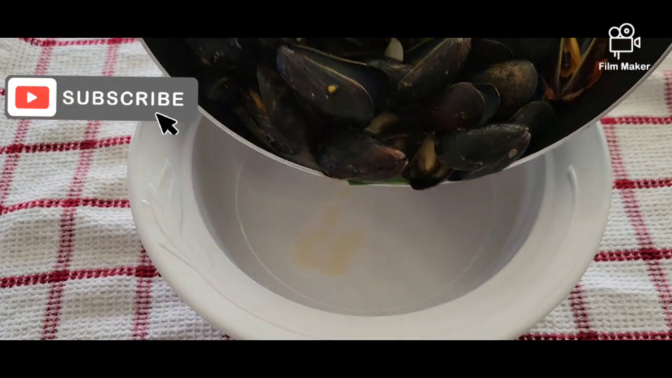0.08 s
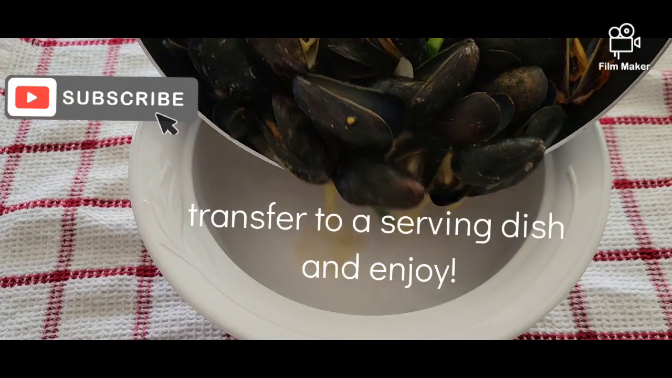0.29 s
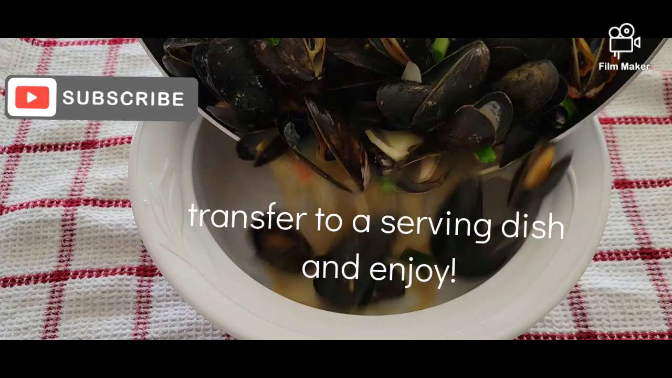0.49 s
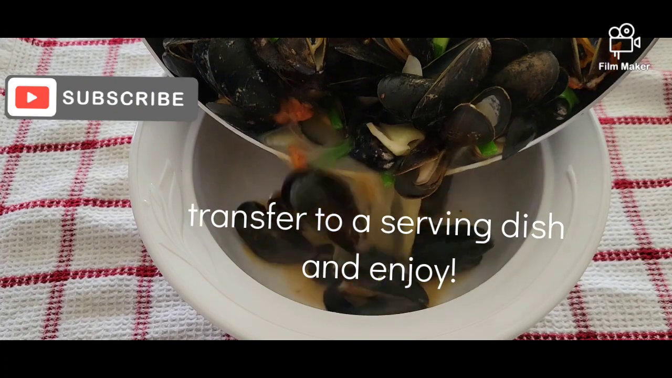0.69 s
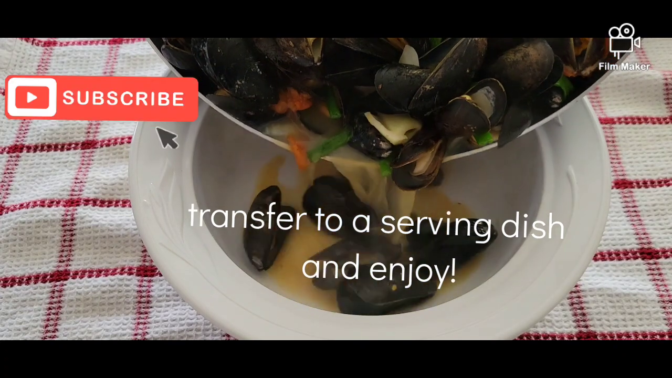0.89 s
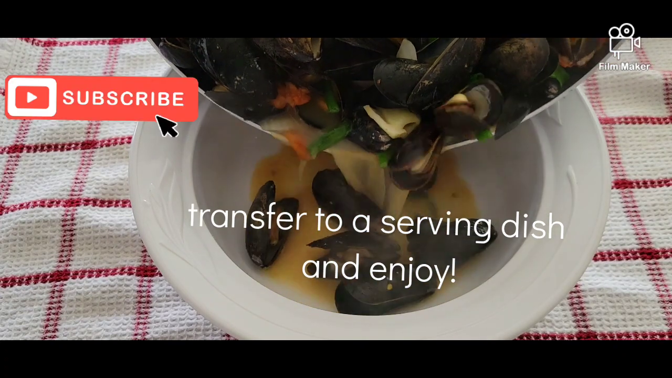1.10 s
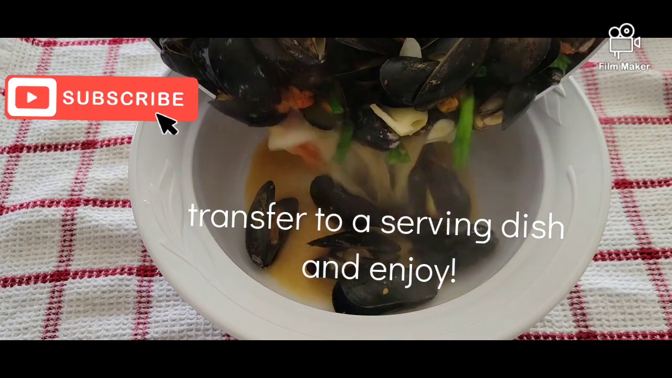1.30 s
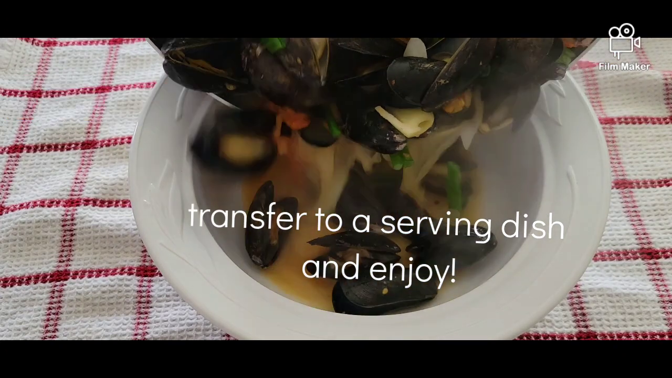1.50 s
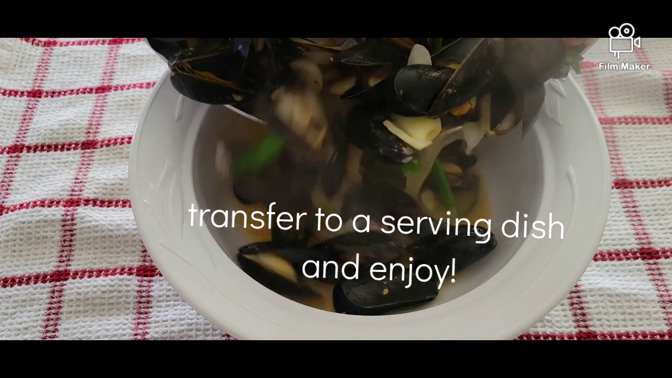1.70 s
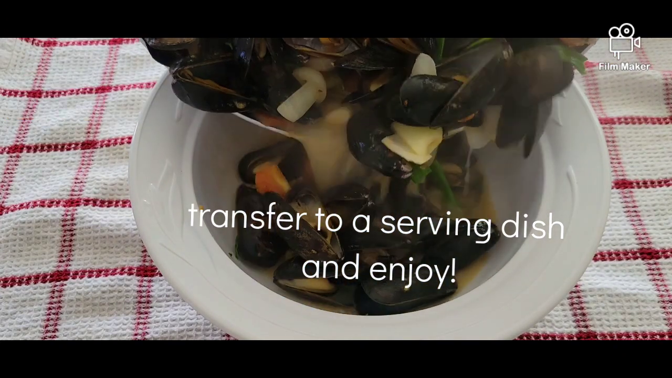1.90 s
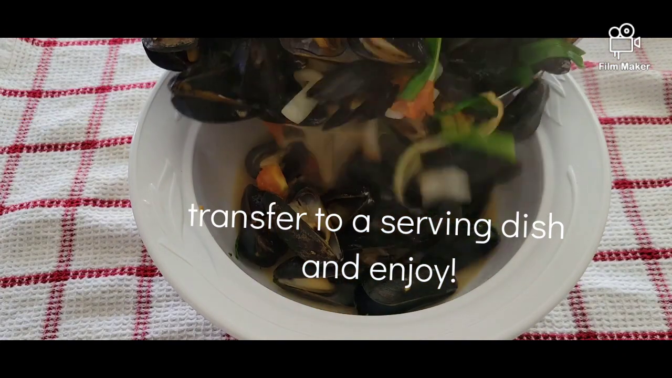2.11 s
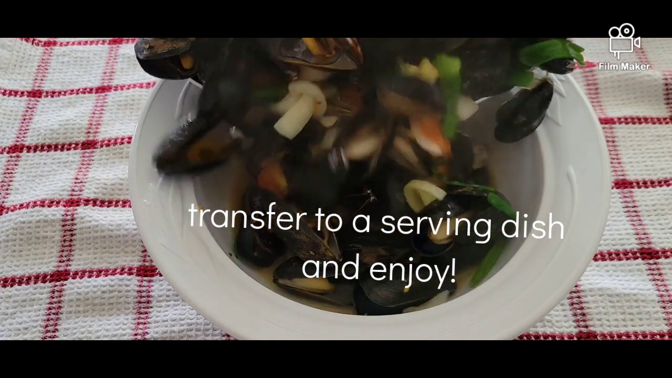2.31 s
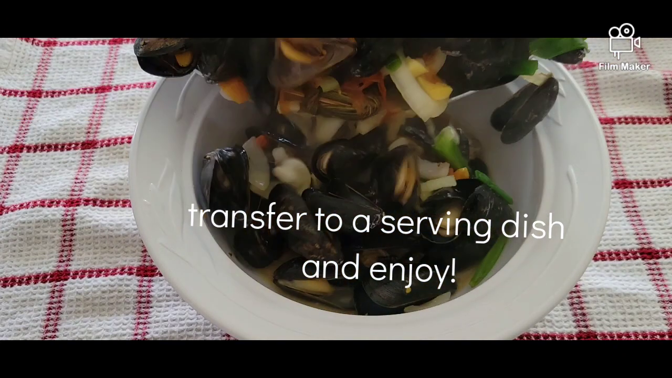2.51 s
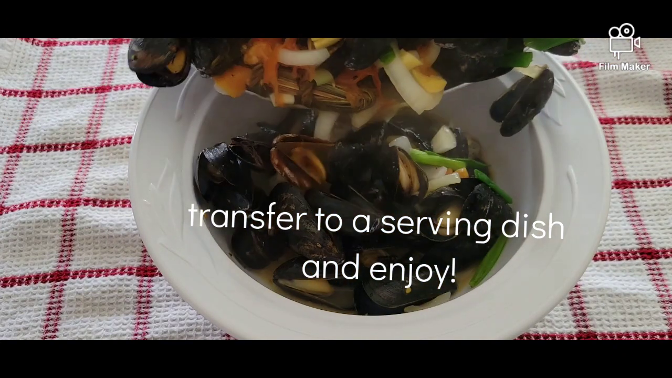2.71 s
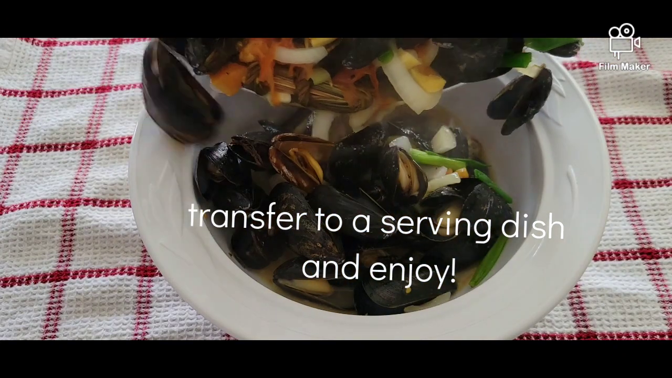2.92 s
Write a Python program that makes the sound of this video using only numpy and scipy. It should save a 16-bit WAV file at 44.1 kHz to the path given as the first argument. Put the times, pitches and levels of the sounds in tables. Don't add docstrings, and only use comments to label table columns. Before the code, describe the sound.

Mussel shells clatter into a ceramic bowl. After faint hum, a hollow knock lands at 0.23 s, then a dense, bright crash with ceramic ringing at 0.45-0.65. Separate clacks follow at 0.7-0.9, lighter rattles around 1.25-1.4, busy clatter at 1.54-1.85 and again 2.0-2.5, thinning to soft knocks and ticks by 2.9. Close, small kitchen, short reverberation, steady low hum.

```python
import sys
import numpy as np
from scipy import signal
from scipy.fft import rfft, irfft
from scipy.io import wavfile
from scipy.ndimage import uniform_filter1d

SR = 44100
rng = np.random.default_rng(int(sys.argv[2]) if len(sys.argv) > 2 else 0)


def dump(signal):
    limited = np.clip(np.atleast_2d(signal).T, -1, 1)
    pcm = np.round(limited * 32767).astype(np.int16)
    wavfile.write(sys.argv[1], SR, pcm)


def level_to_linear(level):
    exponent = np.asarray(level, float) / 20
    return 10 ** exponent


N = 130095

# (time
# [s], peak level # [dB], shell pitch [Hz], treble level [dB])
FURTHER_CLACKS = [(.297, -31, 2150, -29), (0.3855, -30, 1320, -25), (0.4654, -19, 3800, 1.5),
                  (0.723, -21, 3380, -34), (0.741, -24.5, 1980, -25), (0.755, -20, 1780, -27),
                  (0.807, -26, 2850, -25), (1.18, -43, 5430, -12), (1.198, -50, 7160, -5.5),
                  (1.2734, -15.5, 2350, -15.5), (1.3557, -38, 3800, -9), (1.439, -30, 2500, -50),
                  (1.486, -32, 1740, -26), (1.5094, -34, 8700, -7), (2.0125, -25.5, 1840, -24),
                  (2.5754, -29, 4020, -48), (2.765, -34, 1810, -33), (2.8715, -33, 2330, -18)]
CRASH_CLACKS = [
    (0.4499, -10.5, 3750, -5),
    (0.4581, -3.5, 3290, -13.5),
    (0.5025, -7.5, 7530, -6),
    (0.5309, -5, 4990, -10.5),
    (0.5627, -11, 6250, -4.5),
    (0.5905, -8.5, 3330, -19.5),
    (0.6059, -10, 4840, -7),
    (0.6388, -13.5, 12000, -4),
]
POUR_CLACKS = [(0.2344, -7, 2153, -31), (0.4, -17.5, 3180, -29), (0.7046, -10, 2063, -16),
               (0.778, -23, 5070, -19), (0.8123, -16.5, 2826, -21), (0.8556, -21.5, 3260, -21.5),
               (0.8809, -8, 3006, -20), (1.039, -28.5, 1850, -26.5), (1.2568, -27.5, 3780, -15.5),
               (1.268, -19, 1644, -16.5), (1.285, -15, 4500, -20.5), (1.3112, -16.5, 3040, -20),
               (1.3263, -26, 1490, -9.5), (1.3667, -21, 4360, -8), (1.3953, -20.5, 3370, -11.5),
               (1.5398, -7.5, 3950, -16.5), (1.5578, -8.5, 3070, -9), (1.5881, -10, 3180, -36),
                 (1.6229, -8.5, 3190, -17), (1.634, -6.5, 2150, -15.5), (1.731, -6.5, 3030, -28),
                 (1.7516, -9.5, 2105, -5.5), (1.7874, -14, 2060, -9), (1.7994, -18.5, 2130, -7),
                 (1.8236, -9.5, 4090, -6.5), (1.8404, -27, 1970, -15.5), (2.0303, -13, 2090, -20),
                 (2.0619, -16, 2104, -12), (2.0896, -10.5, 2070, -19), (2.1116, -12.5, 3430, -28),
                 (2.1322, -18, 1460, -10.5), (2.1398, -7.5, 3500, -47), (2.1517, -5.5, 2090, -22.5),
               (2.2014, -17.5, 2040, -12), (2.2433, -13.5, 3010, -22.5), (2.2648, -15.5, 2720, -10),
               (2.2737, -12, 3000, -28), (2.3141, -7, 2036, -14), (2.3815, -5.5, 2070, -26),
               (2.4069, -10, 2040, -21), (2.4344, -8.5, 1645, -20), (2.4768, -16, 2034, -31),
               (2.5247, -14, 5130, -19), (2.613, -15.5, 2165, -17.5), (2.630, -19.5, 2160, -18),
               (2.6599, -15, 1730, -24), (2.6774, -24.5, 1820, -17.5), (2.82, -24, 2045, -22.5),
               (2.9205, -25.5, 1640, -45), (2.9444, -30, 1430, -33)]
ALL_CLACKS = FURTHER_CLACKS + CRASH_CLACKS + POUR_CLACKS
# (time [s], lowest mode level [dB], second mode level [dB], upper modes level [dB], ring length factor [1])
BOWL_STRIKES = [(0.232, -60, -15, -43, 0.16), (0.448, -27.5, -21.5, -19.5, 1.46),
                (0.523, -28, -12.5, -16, 2), (0.563, -31.5, -22.5, -30, 1.4),
                (0.581, -31, -29.5, -33.5, 1.2), (0.702, -31, -32, -59, 1.3),
                (0.883, -40.5, -49.5, -36, 0.72), (1.539, -28.5, -17.5, -27, 0.4),
                (1.635, -32.5, -18.5, -22, 0.76), (1.751, -30.5, -19, -17.5, 0.98),
                (1.787, -39, -28.5, -61, 1.55), (2.027, -21, -23, -45, 0.87), (2.263, -34.5, -20, -47, 0.3),
                (2.315, -27, -19.5, -17, 1.1), (2.614, -42.5, -27.5, -32.5, 0.33),
                (2.82, -22.5, -27, -47, 0.33)]
# (frequency [Hz], level [dB], T60 [s])
BOWL_MODES = [(772, -2, 0.6), (2146, 0, 0.33), (3862, 0, 0.25), (5087, 0, 0.12), (5437, -1, 0.25),
              (6115, 2, 0.13), (6647, 0, 0.25), (7815, -8, 0.15), (8030, -8, .15), (8640, -2, 0.2),
              (10860, -9, .2), (5290, -2, .15)]
STRIKE_ARCS = [.6, 0, -.9, 0, 0, .3, -.6, .3, .1, .15, .3, .6, .6, .95, 0, .2]
MODE_ARCS = [0, 0, .6, -1, 0, 1, 0, -1, 1, 0, 0, 1]
# (time [s], note level [dB], pitch [Hz], T60 [s], slap level [dB])
LANDINGS = [(.222, -42, 470, 0.037, -28.5), (.233, -8.5, 528, 0.059, -14), (0.233, -24, 1101, 0.071, -23.5),
            (0.255, -15.5, 513, 0.069, -17), (.29, -28.5, 700, 0.11, -34), (.313, -22, 475, 0.074, -23.5),
            (0.453, -30.5, 484.6, 0.35, -34.5), (.698, -23, 491, 0.053, -22), (.700, -31, 108, 0.029, -18),
            (.703, -21, 1150, 0.035, -15), (.755, -30, 503, 0.046, -26.5), (0.776, -30, 1882, 0.23, -41),
            (.814, -14.5, 1850, 0.018, -46), (.849, -22.5, 1850, 0.027, -38), (.860, -46, 300, .04, -32),
            (.880, 0.5, 1729, 0.021, -18), (0.891, -21, 1803, 0.052, -58), (1.27, -36.5, 530, 0.1, -40),
            (2.061, -22, 915, 0.023, -12.5), (2.191, -24.5, 409, 0.037, -21), (2.194, -20, 828, .04, -17.5),
            (2.198, -33, 253, 0.076, -32), (2.624, -22.5, 1005, 0.028, -26),
            (2.818, -30.5, 144, 0.066, -41), (1.540, -22, 838, .06, -32), (1.752, -24.5, 837, 0.058, -23),
            (1.84, -21.5, 1484, 0.034, -25.5), (2.661, -13.5, 1858, 0.023, -31),
            (.8135, -17, 2890, 0.028, -38), (.856, -16, 3290, 0.021, -36), (1.731, -13, 3096, 0.022, -37),
            (1.587, -19, 3130, 0.039, -37)]
# (frequency [Hz], level [dB], T60 [s])
TABLE_MODES = [(58.6, -26.5, 0.24), (79.7, -33.5, 0.24), (141, -26, 0.12)]
# (frequency [Hz], T60 [s])
ROOM_T60 = [(450, 0.74), (2000, 0.46), (5000, 0.51), (10000, 0.25)]
# (frequency [Hz], level per Hz [dB])
AIR_SPECTRUM = [(24, -48), (40, -20), (140, -3.5), (215, -5.5), (422, -18.5), (4340, -38), (10200, -51),
                (16000, -41)]

PORT_LAG_S = 0.00009
ALIKE_BELOW_HZ = 870
BASS_SIDE_DB = -15
OPPOSITE = np.array([[1], [-1]])


def unit(x):
    return x / np.sqrt(np.mean(x ** 2))


def curve(table, hz):
    table = np.array(table)
    return np.interp(np.log(np.maximum(hz, 1)), np.log(np.maximum(table[:, 0], 1)), table[:, 1])


def band(x, hz, width):
    f = np.arange(x.shape[-1] // 2 + 1) * SR / x.shape[-1]
    return irfft(rfft(x) / (1 + ((f - hz) / width * 2) ** 4), x.shape[-1])


def walk(rate):
    k = int(SR / rate)
    smooth = uniform_filter1d(rng.standard_normal(N), k)
    return unit(uniform_filter1d(smooth, k))


def ring(t, hz, db, t60, rise):
    t = np.maximum(t, 0)[..., None]
    decay = level_to_linear(db - 60 * t / t60)
    onset = 1 - np.exp(-t / rise)
    return (decay * onset * np.sin(2 * np.pi * hz * t)).sum(-1)


def add(out, s, sound):
    i = int(s * SR)
    out[:, i:i + sound.shape[1]] += sound[:, :max(N - i, 0)]


def ports(count, place):
    return np.arange(count) / SR - PORT_LAG_S * (1.06 + place * OPPOSITE)


def clacks():
    lead_s, crack_s, rattle_s = 0.0025, 0.0012, 0.012
    out = np.zeros((2, N))
    f = np.arange(1025) * SR / 2048
    for s, db, hz, treble_db in ALL_CLACKS:
        t = ports(count=2048, place=rng.uniform(-1.58, 1)) - 3 * lead_s
        t60 = 0.019 * (2500 / hz) ** 0.5
        note = ring(t, hz * np.array([1, 1.07]), 1.5 - np.array([0, 5]), t60, rise=0.0019)

        ripple = unit(uniform_filter1d(rng.standard_normal(len(f)), size=24))
        slope = np.clip(np.log(f / 3695 + 1e-9) / 1.14, 0, 1.3)
        low_cut = 1 + (1343 / (f + 1)) ** 3
        colour = level_to_linear(3.5 * ripple + (treble_db - 0.5) * slope) / low_cut
        noise = rng.standard_normal((3, len(t[0])))
        grit = irfft(rfft(noise[:2] + 0.5 * noise[2]) * colour)
        grit = grit * level_to_linear(0.37 * (treble_db + 18.5))

        age = np.maximum(t, 0)
        scrape = level_to_linear(-18) * grit * np.exp(-np.abs(t) / lead_s)
        decay = np.exp(-age / crack_s) + level_to_linear(-10.5) * np.exp(-age / rattle_s)
        crack = 0.95 * grit * (1 - np.exp(-age / 0.00017)) * decay
        pan_db = -1.5 * rng.standard_normal() * 0.5 * OPPOSITE
        add(out, s - 3 * lead_s, (note + scrape + crack) * level_to_linear(db + pan_db))
    return out


def bowl():
    choke_s, spot_db, arc_loss_db = 0.001, 1, 14
    t, out = np.arange(N) / SR, np.zeros((2, N))
    starts = [row[0] for row in BOWL_STRIKES] + [9]
    spot = rng.standard_normal((len(BOWL_STRIKES), len(BOWL_MODES)))
    for m, (hz, db, t60) in enumerate(BOWL_MODES):
        size = np.zeros(N)
        for k, (s, *levels, length) in enumerate(BOWL_STRIKES):
            following = starts[k + 1]
            a, b = int(s * SR), int((following + 6 * choke_s) * SR)
            age = t[a:b] - s
            choke = np.exp(-np.maximum(t[a:b] - following, 0) / choke_s)
            gain_db = db + levels[min(m, 2)]
            if m > 1:
                gain_db += spot_db * spot[k, m] - arc_loss_db * abs(MODE_ARCS[m] - STRIKE_ARCS[k])
            decay = level_to_linear(gain_db - 60 * age / (t60 * length))
            size[a:b] += decay * choke * np.clip(age / 0.00032, 0, 1)
        phase = min(hz / 2600, 1.2) * rng.uniform(0.57, 1) * OPPOSITE
        wobble = level_to_linear(3 * walk(45))
        out += size * wobble * np.sin(2 * np.pi * hz * t + phase)
    return out


def thuds():
    out, t = np.zeros((2, N)), np.arange(SR // 4) / SR
    for s, db, hz, t60, slap_db in LANDINGS:
        noise = rng.standard_normal(len(t)) + 0.2 * rng.standard_normal((2, len(t)))
        slap_decay = level_to_linear(slap_db - 4 - 60 * t / (1.57 * t60))
        slap = unit(band(noise, hz, hz * 2.64)) * slap_decay * (1 - np.exp(-t / 0.0044))
        knock = ring(t, hz * np.array([1, 1.09]), db - np.array([0, 5]), t60, rise=0.0014)
        add(out, s, slap + knock)
    return out


def blows():
    train = np.zeros(N)
    for s, db, *_ in ALL_CLACKS:
        train[int(s * SR)] = level_to_linear(db)
    return train


def ticks():
    ticks_per_s, settle_s, t60_s = 380, 0.03, 0.0053
    out = np.zeros((2, N))
    unrest = signal.lfilter([1], [1, -np.exp(-1 / settle_s / SR)], blows()) + 0.00095
    for u in rng.random((int(ticks_per_s * N / SR), 7)):
        s = u[0] * (N / SR - 0.01)
        hz = 700 * 14 ** u[2:5]
        db = -23 - 4.5 * np.log(u[1] + 0.03)
        db = db - 5 * np.log2(hz / 2500) * (hz > 2500)
        t = ports(count=400, place=2 * u[5] - 1)
        tick = ring(t, hz, db, t60_s * (0.5 + u[6]), rise=0.00063)
        add(out, s, tick * unrest[int(s * SR)])
    return out


def table():
    hz, db, t60 = np.array(TABLE_MODES).T
    pushes = np.sqrt(blows()) * rng.standard_normal(N)
    response = ring(np.arange(SR // 4) / SR, hz, db, t60, rise=0.03)
    return signal.fftconvolve(pushes, response)[:N] * level_to_linear(-0.6 * OPPOSITE)


def room(dry):
    t, tail = np.arange(SR // 2) / SR, 0
    for hz in 90 * 2 ** np.arange(0, 8, 0.5):
        mid, side = band(rng.standard_normal((2, len(t))), hz, hz * 0.36)
        both = mid + min(hz / ALIKE_BELOW_HZ, 1) * side * OPPOSITE
        tail = tail + both * level_to_linear(-60 * t / curve(ROOM_T60, hz)) * (1 - np.exp(-t / 0.00043))
    tail = tail / np.sqrt((tail ** 2).sum(1).mean())
    return level_to_linear(-9) * signal.fftconvolve(dry, tail, axes=1)[:, :N]


def hum():
    f = np.arange(N // 2 + 1) * SR / N
    mid, side = rfft(rng.standard_normal((2, N))) * level_to_linear(curve(AIR_SPECTRUM, f))
    side = side * np.clip(f / ALIKE_BELOW_HZ, level_to_linear(BASS_SIDE_DB), 0.9)
    air = unit(irfft(np.array([mid + side, mid - side]), N)) * level_to_linear(-53.5 + 0.5 * walk(45))

    pair = np.array([[1, -2.0], [1, -2.7]]) * level_to_linear([0, BASS_SIDE_DB])
    motor = unit(band(pair @ rng.standard_normal((2, N)), hz=194.4, width=22.4)) * level_to_linear(-52.5)
    rumble = unit(band(pair @ rng.standard_normal((2, N)), hz=59.6, width=54))
    rumble = rumble * level_to_linear(-63.5 + 3 * walk(5.8))
    return air + motor + rumble


def scene():
    shells = clacks() + thuds() + ticks()
    rings = bowl()
    return shells + rings + table() + room(shells + level_to_linear(-14) * rings) + hum()


def low_pass(x):
    return signal.sosfilt(signal.butter(12, 16990, fs=SR, output="sos"), x)


def record(dry):
    thin = signal.sosfilt(signal.butter(2, 51, "high", fs=SR, output="sos"), dry)
    thin = signal.sosfilt(signal.butter(10, 15000, fs=SR, output="sos"), thin)
    mix = np.tanh(thin * 1.093) / 1.096
    return low_pass(mix)


dry = scene()
out = record(dry)
dump(out)
```